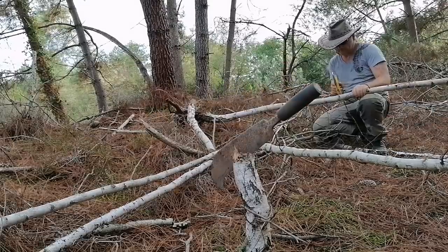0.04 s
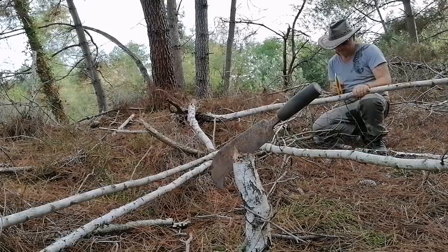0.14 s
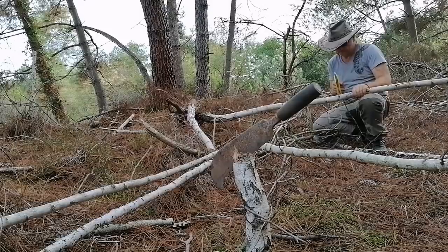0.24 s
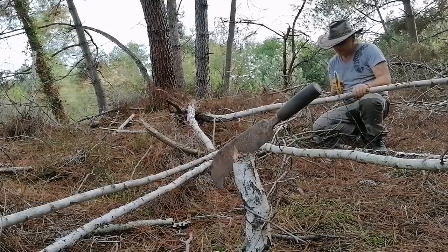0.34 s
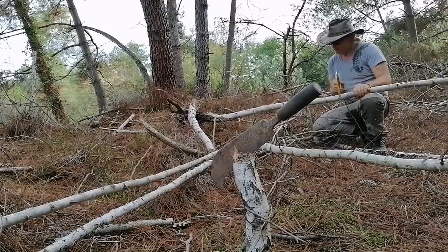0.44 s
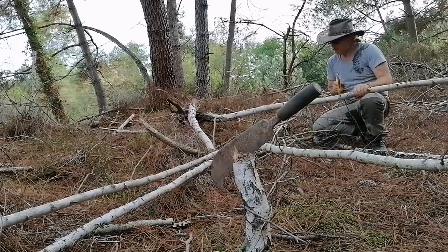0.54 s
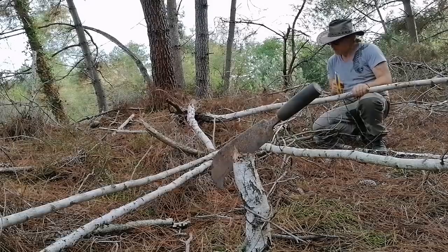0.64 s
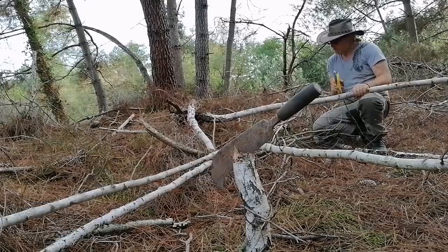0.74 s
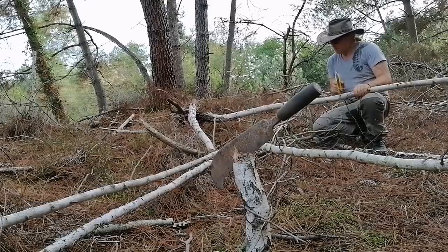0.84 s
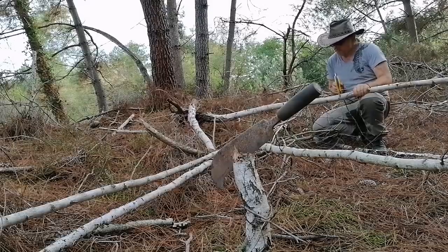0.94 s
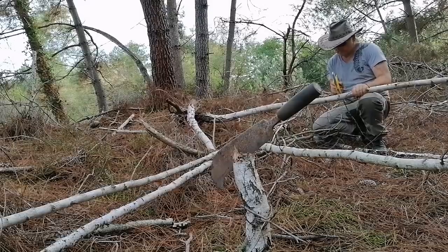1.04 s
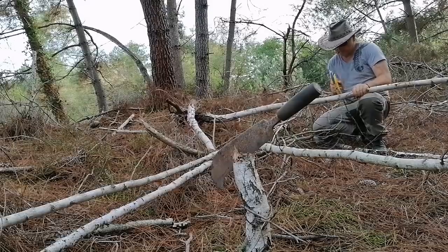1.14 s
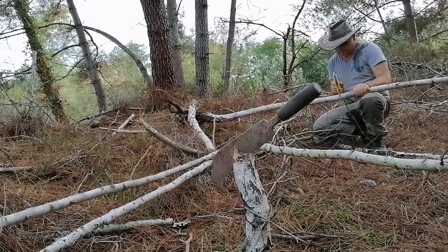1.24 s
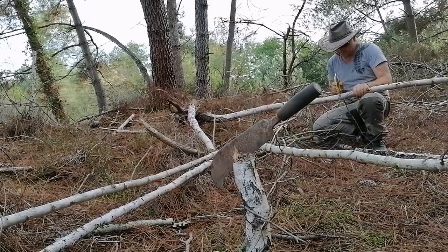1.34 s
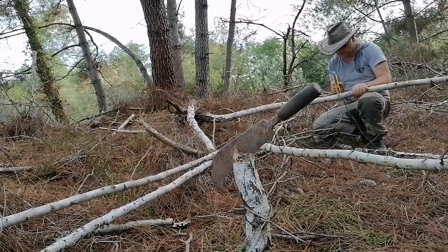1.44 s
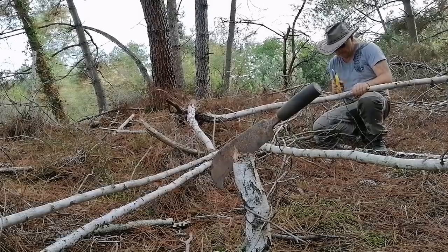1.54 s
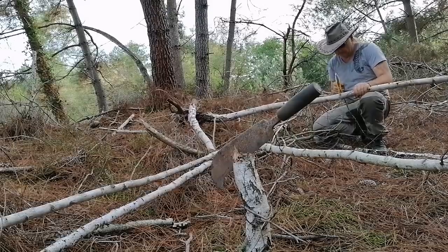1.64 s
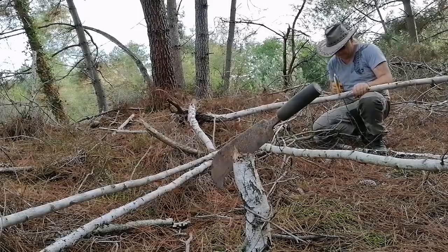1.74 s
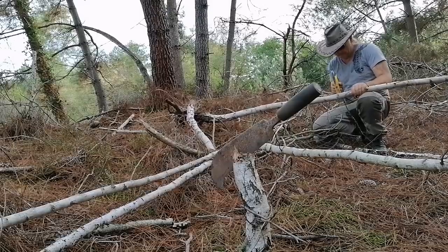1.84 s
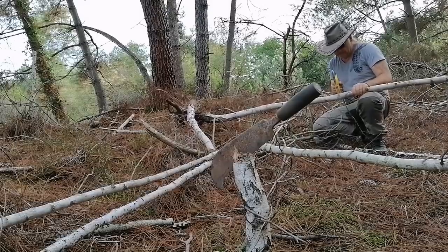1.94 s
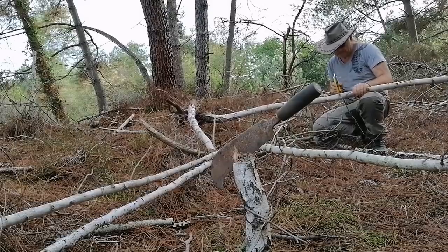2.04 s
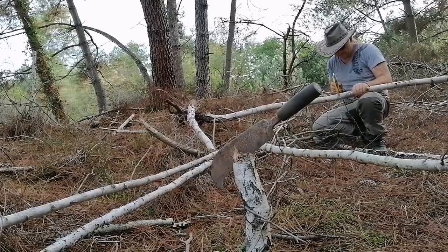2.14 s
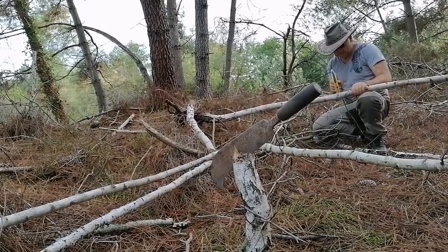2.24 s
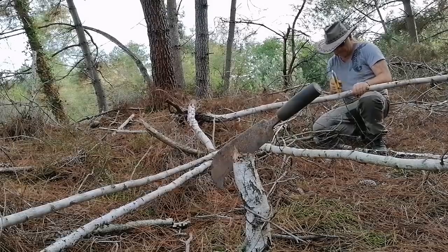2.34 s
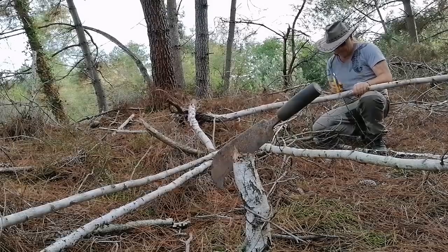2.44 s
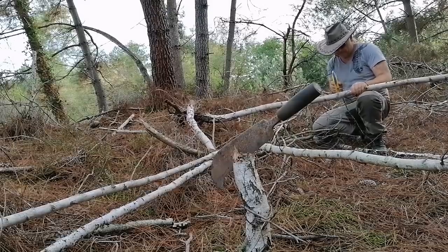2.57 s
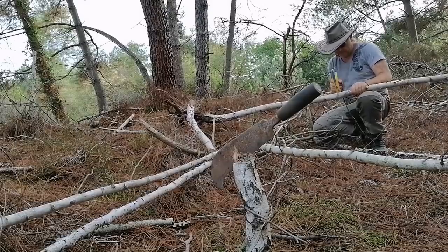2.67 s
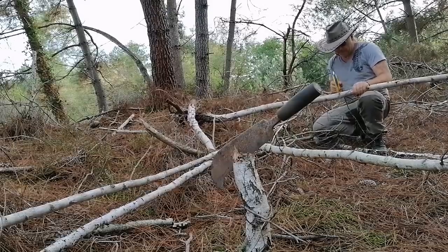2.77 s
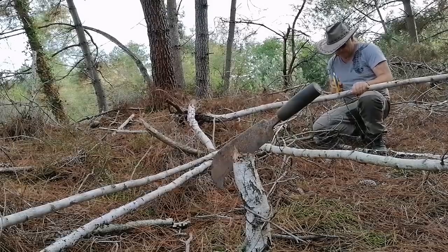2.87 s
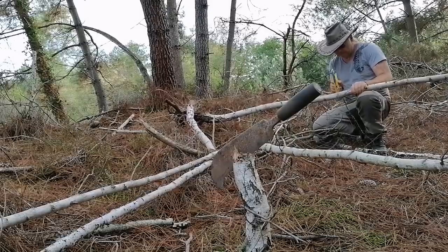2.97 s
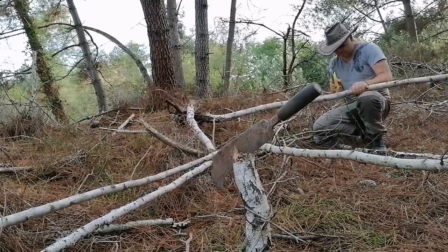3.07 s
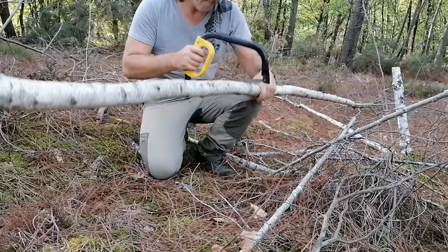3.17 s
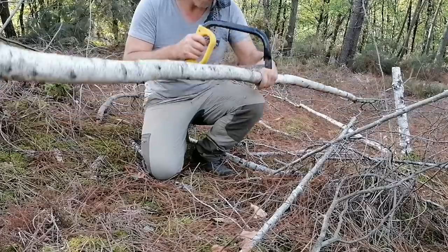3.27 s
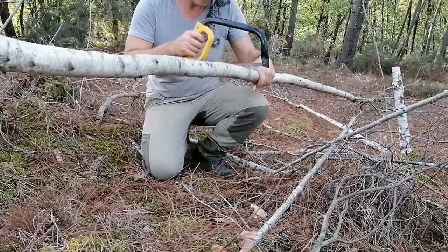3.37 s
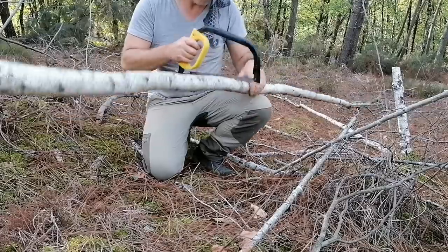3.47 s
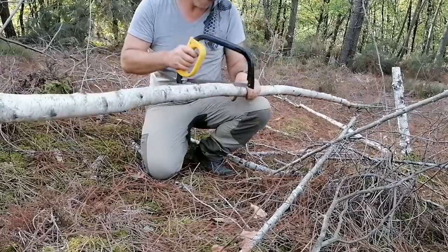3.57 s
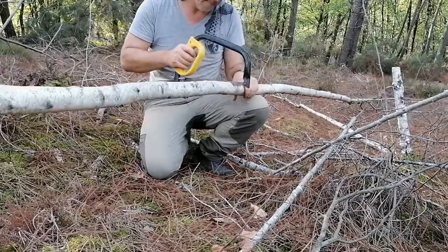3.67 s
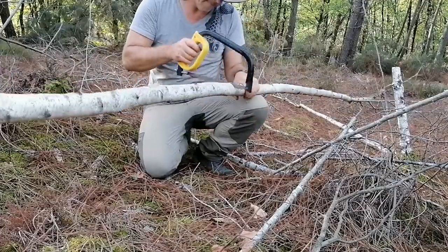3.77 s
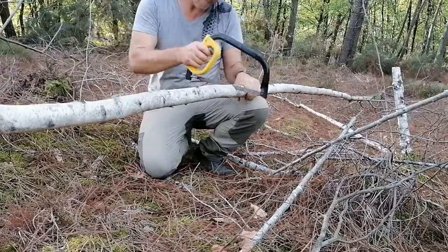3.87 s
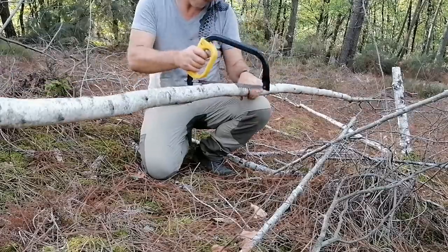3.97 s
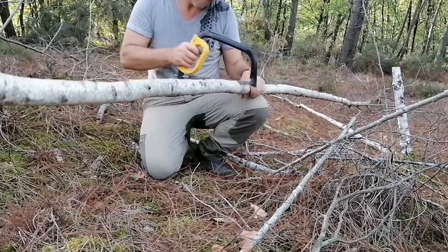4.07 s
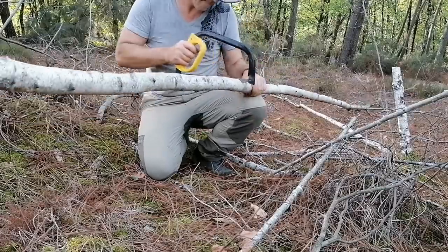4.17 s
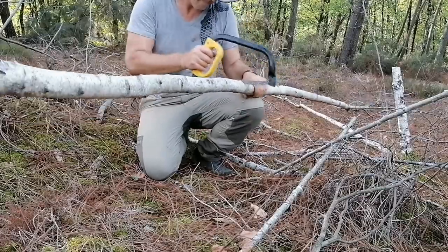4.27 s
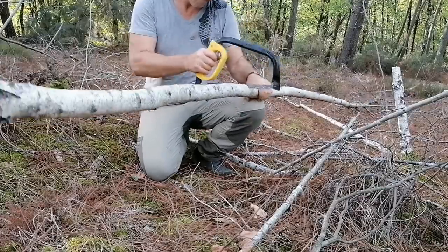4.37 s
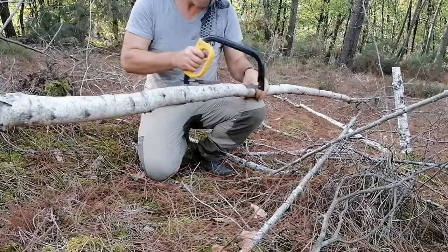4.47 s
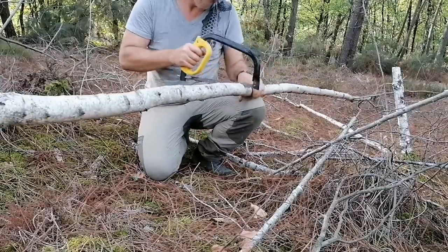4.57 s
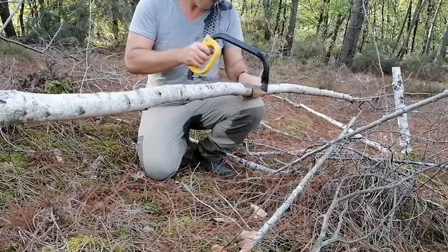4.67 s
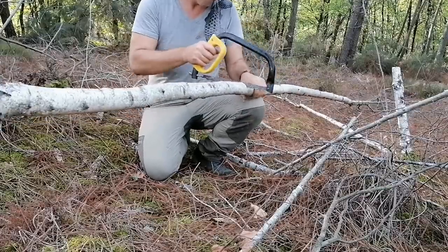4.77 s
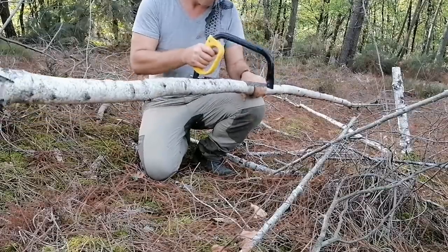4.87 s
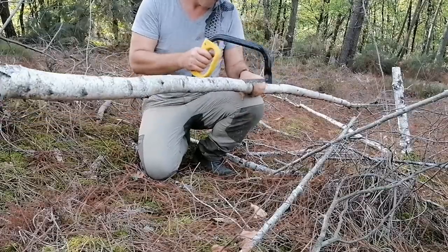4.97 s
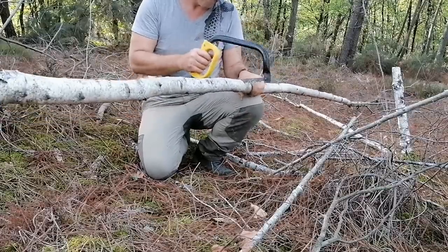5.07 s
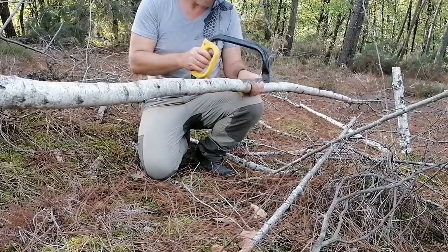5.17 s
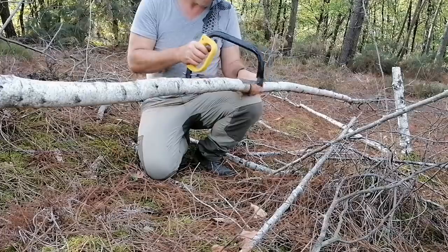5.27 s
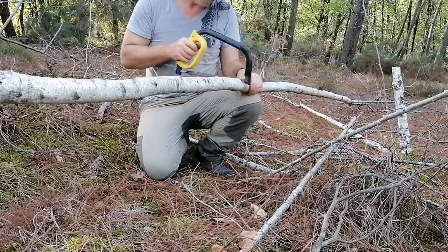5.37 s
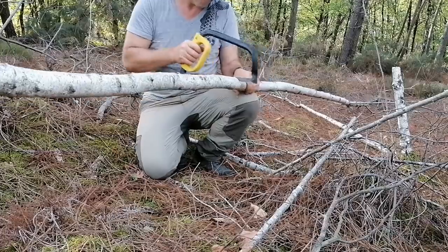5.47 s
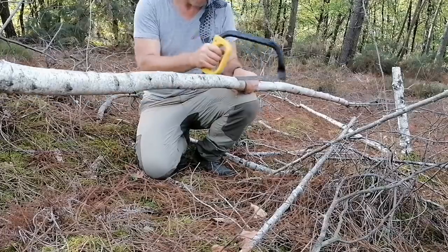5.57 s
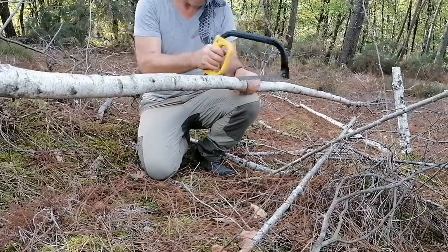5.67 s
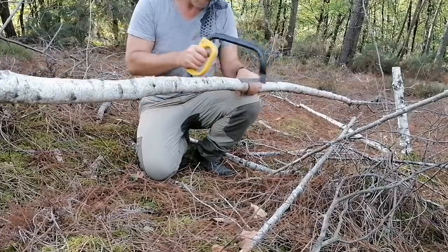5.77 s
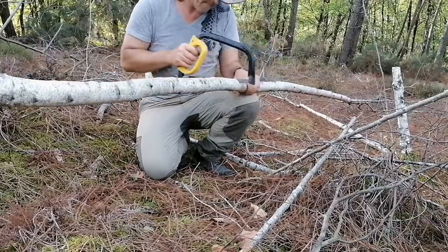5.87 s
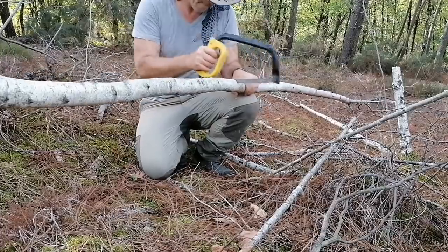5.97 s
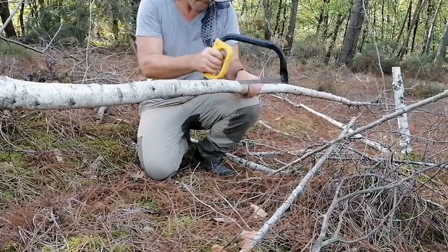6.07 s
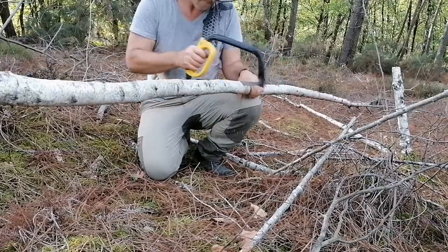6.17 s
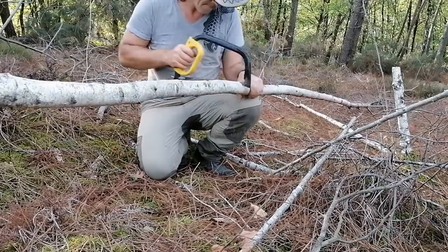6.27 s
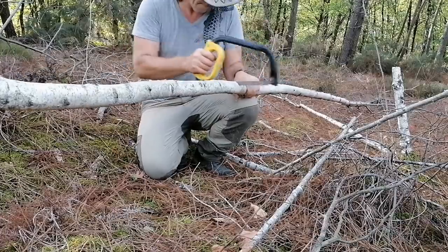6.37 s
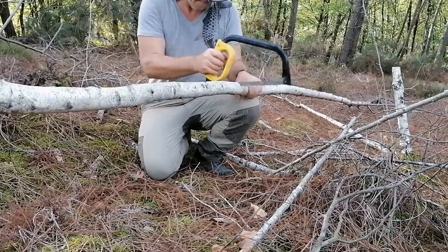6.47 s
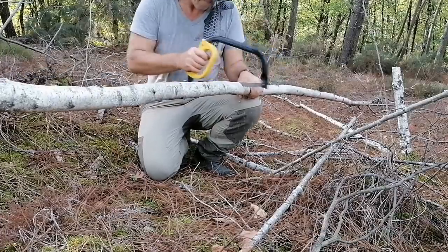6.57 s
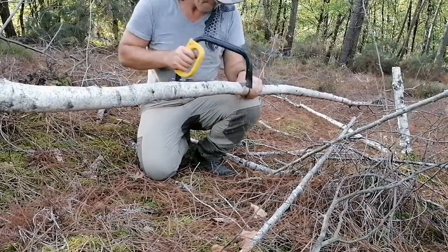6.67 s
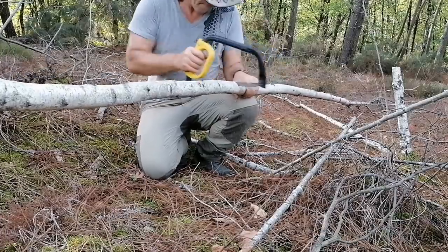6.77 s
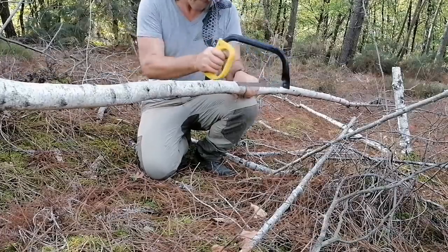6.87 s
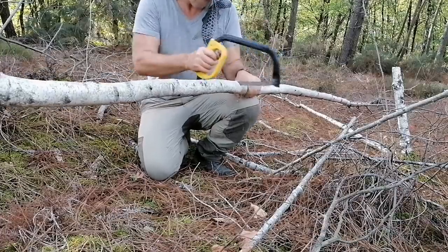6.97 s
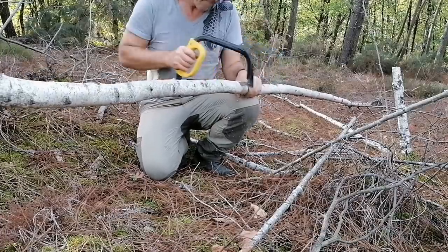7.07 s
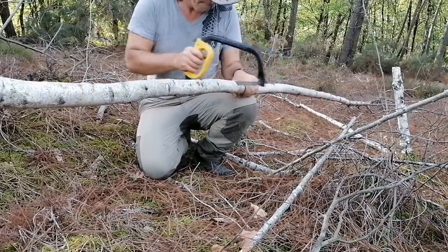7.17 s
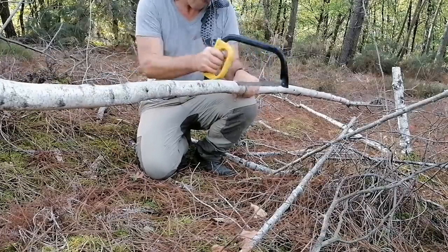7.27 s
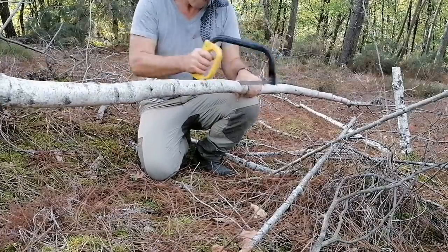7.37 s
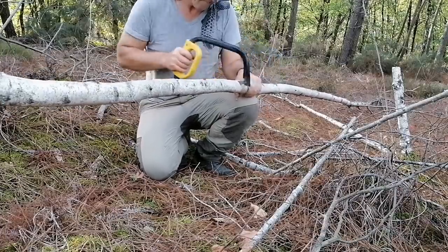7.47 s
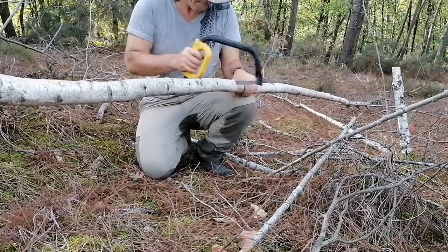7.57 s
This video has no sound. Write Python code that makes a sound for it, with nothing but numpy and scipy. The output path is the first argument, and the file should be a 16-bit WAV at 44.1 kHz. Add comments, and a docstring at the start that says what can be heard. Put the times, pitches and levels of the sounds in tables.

```python
"""Sawing a branch in a quiet wood

A bow saw cuts a thin branch, heard first from afar and then, after a scene change, from nearby.
Its teeth tear the fibres in a hail of tiny bites that ring the branch, rasp in the cut and sing in
the blade. The blade ticks as strokes turn round; the teeth groan, jam and once knock on the wood.
Behind it the forest rustles, wind rumbles on the one microphone and a faint whistle sounds once."""
import sys
import numpy as np
from scipy import signal
from scipy.fft import rfft, irfft
from scipy.io import wavfile
from scipy.ndimage import uniform_filter1d

SR = 44100
rng = np.random.default_rng(int(sys.argv[2]) if len(sys.argv) > 2 else 0)


def dump_mix(stems):
    """Bounce the given channels to the path in sys.argv[1] as a 16-bit WAV at rate SR."""
    frames = np.atleast_2d(stems).T  # one column per channel
    limited = np.clip(frames, -1, 1)  # hard clip at full scale
    pcm = np.round(limited * 32767).astype(np.int16)
    wavfile.write(sys.argv[1], SR, pcm)


N = 336042
SCENE_CHANGE_S = 3.221  # far before this time, near after it

# the branch's natural tones: (pitch [Hz], width [Hz], level on a push [dB], level on a pull [dB])
FAR_BRANCH = [(284.6, 28, -14, -8.5), (461, 184, -15.5, -9.5), (662.4, 40.4, 0.5, 2), (779, 75, 2.5, 3.5),
              (854.3, 120, -3.5, 1), (996, 71, -7, -1.5), (1212, 75, -15, -19.5)]
NEAR_BRANCH = [(422.4, 88, -18, -14.5), (562, 187, -14.5, -10.5), (655, 36, 0, 1), (738, 36, 0, -3),
               (831, 105, -9.5, -6.5), (1060, 57, -8, -4)]
# tones of the saw's frame and blade: (pitch [Hz], width [Hz], push level [dB], pull level [dB])
FAR_FRAME = [(1517, 360, -7, -5), (1875, 61, 2, 1.5), (2193, 128, -4, -3.5), (2640, 270, -3, -3),
             (3246, 264, -10.5, -10), (4430, 83, -6.5, -9), (4800, 250, -11, -8), (5420, 200, -5.5, -4.5),
             (5785, 136, 2, 2), (6230, 15, 4, 3.5), (4130, 22, -10, -11.5)]
NEAR_FRAME = [(1504, 29, -5.5, 1), (1640, 14, -22, -22), (2220, 92, 2.5, -1), (2597, 180, 3, 7.5),
              (3140, 350, -5, 1.5), (4350, 100, -5, -10.5), (4410, 310, -5.5, -9.5), (5394, 210, -6, 1),
              (5745, 48, 5, 8), (6110, 41, -4.5, 1), (3960, 30, -18.5, -17)]
# the broad rasp in the kerf, the slot that the saw cuts: (frequency [Hz], level [dB])
FAR_KERF = [(530, -24), (900, -11.5), (1730, 1), (2230, -6), (3960, -12), (6290, -5.5), (7080, -27),
            (7550, -17), (7900, -47), (10300, -60), (17400, -120)]
NEAR_KERF = [(530, -29.5), (900, -11), (1050, -16.5), (1190, -4), (2190, -7), (3850, -11.5), (7080, -9),
             (7550, -29), (7900, -52), (10300, -64.5), (17400, -120)]


def gain_of(db):
    return 10 ** (np.asarray(db) / 20)


def unit_rms(x):
    return x / np.sqrt(np.mean(x ** 2) + 1e-20)


def with_peak(x, db):
    return gain_of(db) * x / abs(x).max()


def add(mix, start_s, sound):
    part = mix[round(start_s * SR):][:len(sound)]
    part += sound[:len(part)]


def level_at(spectrum, hz):
    known_hz, db = np.transpose(spectrum)
    return np.interp(np.log(hz + 1), np.log(known_hz + 1), db)


def equalise(x, spectrum):
    return irfft(rfft(x) * gain_of(level_at(spectrum, np.fft.rfftfreq(N, 1 / SR))), N)


def ring(tones, way):
    """An object's answer to one tap on a push (way 0) or pull (1): wider tones die away sooner."""
    t = np.arange(8000) / SR
    out = 0
    for k, (hz, width, *db) in enumerate(tones):
        fade = np.exp(-np.pi * width * t)
        out += (-1) ** k * gain_of(db[way]) * width * fade * np.sin(2 * np.pi * hz * t)
    return out / np.linalg.norm(out)


def shaped_click(spectrum):
    """A click with the given spectrum and its energy packed at the start (minimum phase)."""
    db = np.maximum(level_at(spectrum, abs(np.fft.fftfreq(4096, 1 / SR))), -100)
    response = np.exp(np.conj(signal.hilbert(np.log(gain_of(db)))))
    click = np.fft.ifft(response).real[:1024]
    return click / np.linalg.norm(click)


def drift(x, db, bins, frames):
    """Makes a sound louder and softer in random patches, `bins` wide in pitch and `frames` long."""
    slices = signal.stft(x, nperseg=512, noverlap=384)[2]
    patches = rng.standard_normal(slices.shape[::-1]).T
    for _ in range(2):
        patches = uniform_filter1d(uniform_filter1d(patches, size=bins, axis=0), size=frames, axis=1)
    slices *= gain_of(db * unit_rms(patches))
    return unit_rms(signal.istft(slices, nperseg=512, noverlap=384)[1][:N])


def forest_rustle(far):
    """The wood rustles in the distance: soft noise whose tone colour slowly drifts."""
    # the rustle's tone colour: (frequency [Hz], level [dB])
    far_air = [(20, -24.5), (190, -5.5), (460, -2.5), (540, -11), (780, -4), (1250, -11), (2230, -13.5),
               (3240, -14.5), (3970, -20.5), (5630, -12), (6380, -7), (7060, -8), (8000, -17)]
    near_air = [(20, -34), (200, -16.5), (350, -1), (600, -3.5), (1200, -6), (1900, -15.5), (2600, -13),
                (3400, -16), (4000, -24), (4800, -13.5), (6000, -15.5), (7060, -15), (8000, -24.5)]
    # the near rustle swells while the saw is set in place: (time [s], gain [dB])
    swell = [(3.29, 2.5), (3.32, 6), (3.5, 3), (3.56, 2.5), (4.04, 3), (4.2, 5), (5.0, 1), (5.4, -1),
             (7.6, 1.5)]
    noise = rng.standard_normal(N)
    if far:
        return gain_of(-65) * drift(equalise(noise, far_air), db=0.5, bins=6, frames=16)
    level_db = -68.5 + np.interp(np.arange(N) / SR, *np.transpose(swell))
    return gain_of(level_db) * drift(equalise(noise, near_air), db=1.0, bins=6, frames=16)


def wind():
    """Lumpy gusts rumble on the microphone in a low and an upper band."""
    # wind strength: (time [s], low rumble [dB], upper rumble [dB])
    gusts = [(0.0, -64, -69), (0.3, -67, -82), (1.66, -64.5, -69.5), (2.89, -68, -79), (3.33, -71, -66.5),
             (4.63, -75, -67.5), (5.32, -68.5, -64.5), (5.45, -74, -68), (6.39, -71.5, -73.5),
             (7.62, -73, -69.5)]
    lumps_per_s, lump_db = 9, 1.5
    times, low_db, upper_db = np.transpose(gusts)
    out, t = 0, np.arange(N) / SR
    for db, band_hz in ((low_db, [28, 95]), (upper_db, [115, 300])):
        band = signal.butter(2, band_hz, btype="band", fs=SR, output="sos")
        lumps = np.interp(t * lumps_per_s, np.arange(99), rng.standard_normal(99))
        rumble = unit_rms(signal.sosfilt(band, rng.standard_normal(N)))
        out += gain_of(np.interp(t, times, db) + lump_db * lumps) * rumble
    return out


def bites(per_s, spread_db, tear_db, grip_db):
    """Scattered bites of unequal size over a fine tearing noise; the teeth's grip comes and goes."""
    size = gain_of(spread_db * np.minimum(rng.exponential(1, N), 4)) * rng.choice([-1., 1.], N)
    hail = unit_rms(size * (rng.random(N) < per_s / SR))
    tearing = gain_of(tear_db) * rng.standard_normal(N)
    grip = unit_rms(uniform_filter1d(uniform_filter1d(rng.standard_normal(N), size=220), size=220))
    return unit_rms((hail + tearing) * gain_of(grip_db * grip))


def teeth():
    """Hails of bites for branch, kerf and blade; their colour shifts as the contact point wanders."""
    heavy = drift(bites(per_s=900, spread_db=3.5, tear_db=0, grip_db=2), db=2.5, bins=2, frames=14)
    fine = drift(bites(per_s=3000, spread_db=3, tear_db=-1, grip_db=1), db=2.08, bins=5, frames=7)
    edge = drift(bites(per_s=1700, spread_db=0.5, tear_db=-1, grip_db=2.4), db=1.2, bins=3, frames=14)
    return unit_rms(heavy + 0.62 * fine), fine, unit_rms(edge + 0.45 * fine)


def saw_strokes(hails, far):
    """Each stroke's bites shake branch, kerf with frame, and blade: the faster, the louder."""
    # pushes and pulls in turn: (start [s], length [s], fastest point [0-1], sharpness of the speed
    # peak [exponent], rasp level there [dB], branch over rasp [dB], blade over rasp [dB])
    strokes = [(0.002, 0.2, 0.43, 2.74, -48, 4, 6), (0.177, 0.2, 0.61, 3.3, -51.5, -1.5, 7),
               (0.354, 0.21, 0.53, 3, -47.5, 3.5, 7.5), (0.553, 0.19, 0.69, 1.46, -51, 0, 8),
               (0.749, 0.23, 0.41, 4.3, -45.5, 3, 6.5), (0.945, 0.2, 0.67, 1.54, -51, 1, 7),
               (1.153, 0.21, 0.45, 3.56, -46, 2.5, 4.5), (1.365, 0.19, 0.6, 1.93, -49, -1.5, 4),
               (1.543, 0.21, 0.46, 4, -45, 4.8, 9), (1.747, 0.19, 0.53, 1.64, -50, -2, 5),
               (1.931, 0.21, 0.46, 3.2, -45, 3, 6), (2.131, 0.18, 0.63, 1.6, -48.6, -0.5, 6.5),
               (2.309, 0.23, 0.45, 3.63, -45.0, 4, 5.5), (2.507, 0.21, 0.57, 3, -46, 0.6, 3.5),
               (2.697, 0.22, 0.45, 4.16, -45, 5.5, 7.5), (2.893, 0.19, 0.63, 1.95, -47.5, 0.5, 4),
               (3.06, 0.16, 0.74, 1.41, -42, -0.5, 6), (3.699, 0.28, 0, 0.48, -64.5, 2, -30),
               (3.93, 0.11, 0.76, 1.1, -51.5, -0.5, -7.5), (4.184, 0.19, 0.36, 2.6, -49, -2, -18),
               (4.33, 0.17, 0.71, 2.6, -41.5, -1.2, -6.9), (4.583, 0.18, 0.4, 2.1, -54, -1.5, -8.5),
               (4.76, 0.15, 0.84, 0.85, -51, 0.5, -4.5), (5.396, 0.25, 0.56, 2.2, -57, -2, -11.5),
               (5.601, 0.25, 0.57, 2.84, -40.5, 3, -10), (5.877, 0.2, 0.44, 1.6, -45.5, 0.3, -10),
               (6.063, 0.2, 0.51, 2.3, -40, 3, -10.5), (6.303, 0.17, 0.44, 0.78, -42, -2, -11),
               (6.469, 0.21, 0.53, 2.3, -35.5, 0.3, -9), (6.691, 0.2, 0.54, 1.95, -41.0, -3, -8.5),
               (6.877, 0.22, 0.51, 2.44, -36.5, 0.5, -9.5), (7.111, 0.2, 0.49, 1.9, -43.5, 0, -6.5),
               (7.295, 0.19, 0.5, 2.32, -36.5, 2.7, -8.5), (7.499, 0.13, 0.72, 0.67, -40, -1.5, -7.5)]
    # the blade's high singing tones: (pitch [Hz], width [Hz], push level [dB], pull level [dB])
    far_blade = [(6864, 160, -4.5, 0), (6770, 71, 0, -6), (7007, 73, -5, -11), (7165, 107, -10.5, -3),
                 (7250, 140, -9.5, -4.5)]
    near_blade = [(7060, 67, -2.5, 6), (7070, 135, -4.5, -4), (7256, 200, -10.5, 1.5)]
    # pairs are (push, pull); a rise is how much a part gains on the rasp during one stroke
    if far:
        branch, frame, blade, kerf = FAR_BRANCH, FAR_FRAME, far_blade, FAR_KERF
        frame_db, branch_rise_db, blade_rise_db = 3.7, (15, -13.5), (0.5, -8)
    else:
        branch, frame, blade, kerf = NEAR_BRANCH, NEAR_FRAME, near_blade, NEAR_KERF
        frame_db, branch_rise_db, blade_rise_db = -0.91, (5.9, 2.5), (0.4, 0.3)
    flatten = (0.59, 1)  # the biting teeth flatten the stroke's loudest part
    scrape = np.pad(shaped_click(kerf), (0, 8000 - 1024))
    bodies = []
    for way in (0, 1):
        rasp = scrape + gain_of(frame_db) * ring(frame, way)
        bodies.append((ring(branch, way), rasp / np.linalg.norm(rasp), ring(blade, way)))
    out = np.zeros(N)
    for k, (start, length, fastest, sharpness, rasp_db, branch_db, blade_db) in enumerate(strokes):
        if (start < SCENE_CHANGE_S) != far:
            continue
        way = k % 2
        span = np.arange(round(start * SR), min(round((start + length) * SR), N))
        progress = (span - span[0]) / (length * SR)
        skew = np.log(0.5) / np.log(np.clip(fastest, 0.1, 0.9))
        speed = np.sin(np.pi * progress ** skew) ** sharpness
        loudness = gain_of(rasp_db) * np.tanh(flatten[way] * speed) / np.tanh(flatten[way])
        branch_db += branch_rise_db[way] * (progress - 0.5)
        blade_db += blade_rise_db[way] * (progress - 0.5)
        for hail, db, body in zip(hails, (branch_db, 0, blade_db), bodies[way]):
            add(out, start, signal.fftconvolve(hail[span] * loudness * gain_of(db), body))
    return out


def tree_echo(x):
    """Trunks and ground scatter the sound and give it a short tail."""
    delay_s, fade_s, echo_db = 0.004, 0.17, -19.5
    t = np.arange(8000) / SR
    tail = rng.standard_normal(8000) * gain_of(-60 * t / fade_s) * (t > delay_s)
    return x + gain_of(echo_db) * signal.fftconvolve(x, tail / np.linalg.norm(tail))[:N]


def ticks_and_crackles():
    """The blade ticks, twigs snap, fallen leaves crackle: each a brief ring over a wide click."""
    # blade ticks and twig snaps: (time [s], ring peak [dB], pitch [Hz], click over ring [dB])
    ticks = [(0.0313, -53, 7310, -31), (0.28, -35, 7040, -17), (0.3835, -44, 7320, -22),
             (0.596, -34.5, 6850, -12), (1.0154, -38, 6890, -29), (1.4138, -33.5, 6800, -11),
             (1.578, -42, 7120, -8), (1.774, -43, 6900, -14), (1.9733, -43, 6900, -28),
             (2.3637, -33.5, 6950, -29), (2.574, -29.5, 6900, -16), (2.7392, -57.5, 6990, -17),
             (2.9218, -41, 6990, -12), (2.975, -34.5, 6880, -23), (3.516, -49, 5370, -20),
             (3.7273, -49.5, 6100, -15), (3.804, -51, 2600, -10), (3.8644, -56, 5280, -18),
             (3.9893, -49, 2930, -17), (4.0684, -53, 7030, -19), (4.0856, -55, 5550, -19),
             (4.8254, -57, 5630, -4), (5.19, -62, 2970, -15), (5.1976, -62, 5260, -17),
             (5.895, -46, 3120, -20), (6.0995, -50, 2800, -25), (6.317, -39, 3290, -24),
             (6.9117, -49, 7360, -15), (7.1435, -33.5, 5730, -10), (7.4799, -35, 5480, 0.5),
             (7.51, -31.5, 5420, -6.5)]
    crackle_count, crackle_db, spread_db, crackle_hz = 40, -62, 3, (2800, 7100)
    attack_s, fade_s = 0.00048, 0.042
    crackles = []
    for when, pitch, size in rng.random((crackle_count, 3)):
        db = crackle_db + spread_db * (2 * size - 1)
        crackles.append((when * N / SR, db, np.interp(pitch, (0, 1), crackle_hz), -19))
    out, t = np.zeros(N), np.arange(3000) / SR
    wide_band = signal.butter(2, [900, 7000], btype="band", fs=SR, output="sos")
    for start, db, hz, click_db in crackles + ticks:
        puff = rng.standard_normal(len(t)) * gain_of(-60 * t / fade_s) * np.minimum(t / attack_s, 1)
        narrow_band = signal.iirpeak(hz, Q=4, fs=SR)
        ringing = signal.lfilter(*narrow_band, signal.lfilter(*narrow_band, puff))
        click = signal.sosfilt(wide_band, puff)
        add(out, start, with_peak(ringing, db) + with_peak(click, db + click_db))
    return out


def jams():
    """The teeth catch: a hard blow and a short judder ring the branch and rattle frame and kerf."""
    # catches, with the knock as the saw is set: (time [s], branch peak [dB], rattle over branch [dB])
    catches = [(.099, -42, -14.5), (.792, -47, -10), (.838, -36, -9), (1.016, -41, -6), (1.199, -41.5, -16),
               (1.41, -47.5, -6), (1.611, -37.5, -0.5), (2.02, -48, 0), (2.046, -33, -13.5),
               (2.168, -44, -8), (2.365, -43.5, -4), (2.778, -32.5, -4.5), (2.949, -42, -13),
               (3.157, -32.5, -7.5), (4.02, -30, -1.6), (4.053, -59, 7), (4.205, -46.5, 2), (4.432, -40, 5),
               (4.878, -43, 2), (5.71, -28.5, -5.5), (5.988, -38, -5), (6.125, -32, -10), (6.316, -39, -7),
               (6.573, -25, -4), (6.742, -34, -1), (6.975, -22.5, -24), (7.004, -27.5, -9),
               (7.163, -33, 1.5), (7.196, -35.5, 1), (7.243, -37, 3), (7.362, -28.5, -16),
               (7.418, -29.5, -1)]
    out, judder_s = np.zeros(N), 0.012
    for start, db, rattle_db in catches:
        if start < SCENE_CHANGE_S:
            branch, frame, kerf = FAR_BRANCH, FAR_FRAME, FAR_KERF
        else:
            branch, frame, kerf = NEAR_BRANCH, NEAR_FRAME, NEAR_KERF
        judder = rng.standard_normal(2000) * (np.arange(2000) < judder_s * SR)
        rattle = ring(frame, way=0)
        add(rattle, 0, 1.1 * shaped_click(kerf))
        add(out, start, with_peak(signal.fftconvolve(judder, rattle), db + rattle_db))
        blow = np.append(32.0, judder[1:])  # one big spike leads the judder
        add(out, start, with_peak(signal.fftconvolve(blow, ring(branch, way=0)), db))
    return out


def groans():
    """Evenly spaced teeth pass the wood ever more slowly: a shaky, sinking tone with a weak octave."""
    # tones of the passing teeth: (time [s], starting pitch [Hz], level [dB])
    tones = [(0.621, 564, -64.5), (1.02, 708, -52), (1.238, 454, -54.5), (1.449, 526, -58.5),
             (1.62, 620, -51.5), (1.831, 512, -51.5), (2.201, 519, -56.5), (2.62, 526, -59),
             (2.791, 513, -54.5), (2.99, 561, -53.5), (5.72, 572, -56), (6.109, 590, -43),
             (6.56, 604, -39.5), (6.95, 596, -49), (7.36, 612, -49)]
    length_s, far_end_ratio, near_end_ratio = 0.086, 0.57, 0.78  # ratio: last pitch over first
    out, progress = np.zeros(N), np.arange(0, 1, 1 / (length_s * SR))
    for start, first_hz, db in tones:
        end_ratio = far_end_ratio if start < SCENE_CHANGE_S else near_end_ratio
        hz = first_hz * (1 - (1 - end_ratio) * progress)
        waver, flutter = (unit_rms(uniform_filter1d(noise, size=300))[:len(progress)]
                          for noise in rng.standard_normal((2, 8000)))
        phase = 2 * np.pi * np.cumsum(hz * (1 + 0.047 * waver)) / SR
        loudness = gain_of(db + 0.43 * flutter) * np.sin(np.pi * progress)
        add(out, start, loudness * (np.sin(phase) + 0.18 * np.sin(2 * phase)))
    return out


def whistle():
    """One faint, thin tone swells and dies."""
    start_s, hz, length_s, db = 5.241, 3700, 0.03, -71
    out, t = np.zeros(N), np.arange(0, length_s, 1 / SR)
    add(out, start_s, gain_of(db) * np.sin(2 * np.pi * hz * t) * np.sin(np.pi * t / length_s))
    return out


def scene():
    """The far scene, then the near one, the same in both channels."""
    t = np.arange(N) / SR
    short_sounds = ticks_and_crackles() + groans() + jams()
    hails = teeth()
    far = tree_echo(saw_strokes(hails, far=True) + short_sounds)
    far += forest_rustle(far=True)
    near = tree_echo(saw_strokes(hails, far=False) + short_sounds * (t > SCENE_CHANGE_S))
    near += forest_rustle(far=False)
    mix = np.where(t < SCENE_CHANGE_S, far, near) + whistle() + wind()
    return np.array([mix, mix])


def record(dry):
    """The microphone dulls the treble, the highest sounds are cut off and a trace of hiss is added."""
    # the microphone's treble loss: (frequency [Hz], gain [dB])
    microphone = [(7400, 0), (7700, -15), (8000, -40), (8300, -39.5)]
    cutoff_hz, hiss_db, hiss_cutoff_hz = 8300, -100, 15800
    low_pass = signal.firwin(511, cutoff_hz, window=("kaiser", 9), fs=SR)
    dulled = signal.oaconvolve(equalise(dry, microphone), low_pass[None], "same")
    hiss = gain_of(hiss_db) * rng.standard_normal(N)
    return dulled + signal.oaconvolve(hiss, signal.firwin(255, hiss_cutoff_hz, fs=SR), "same")


dry = scene()
out = record(dry)
dump_mix(out)
```